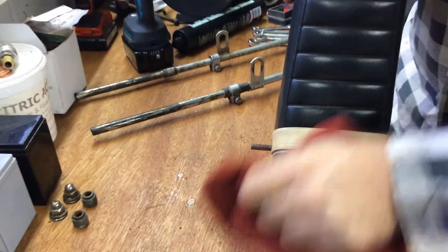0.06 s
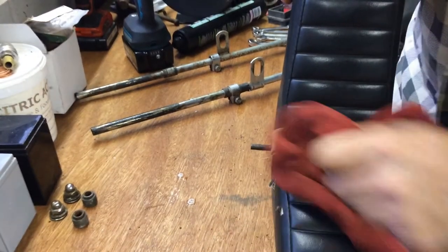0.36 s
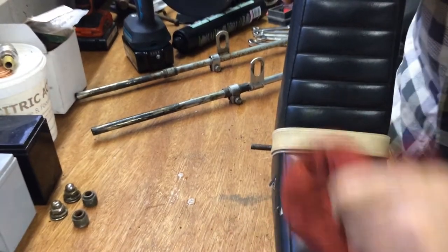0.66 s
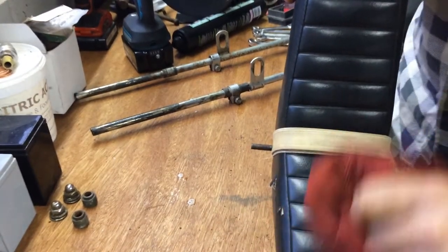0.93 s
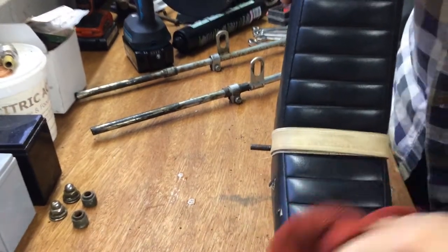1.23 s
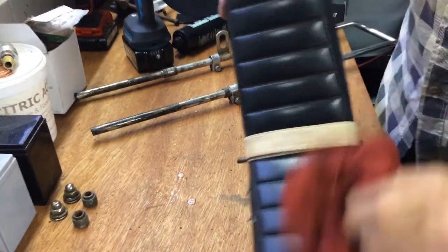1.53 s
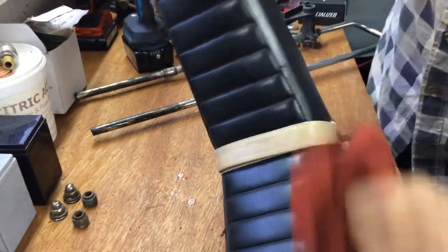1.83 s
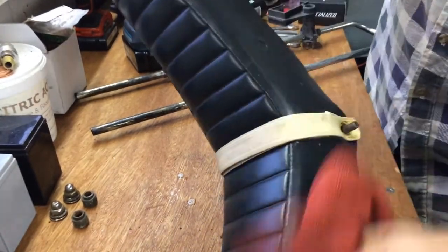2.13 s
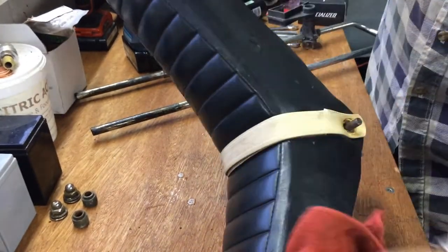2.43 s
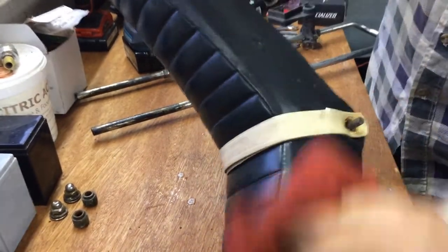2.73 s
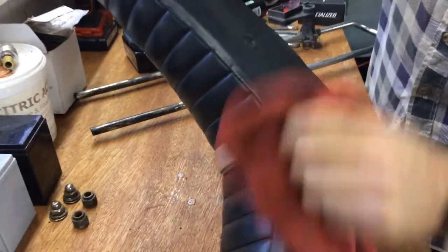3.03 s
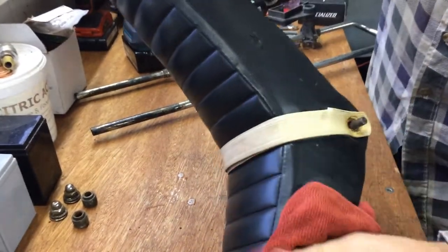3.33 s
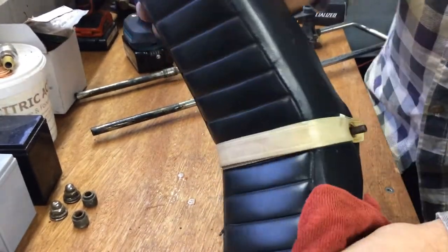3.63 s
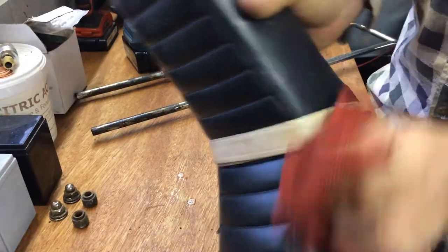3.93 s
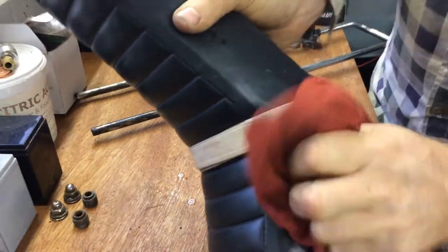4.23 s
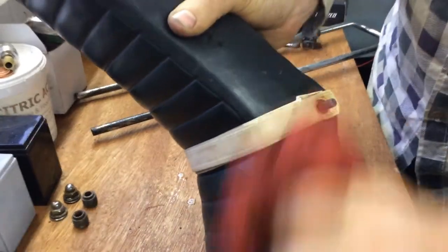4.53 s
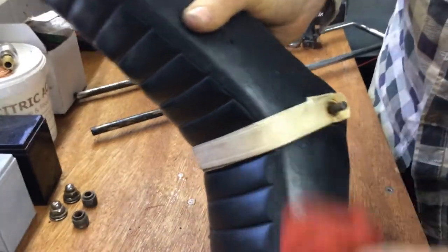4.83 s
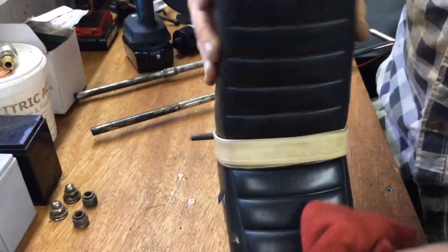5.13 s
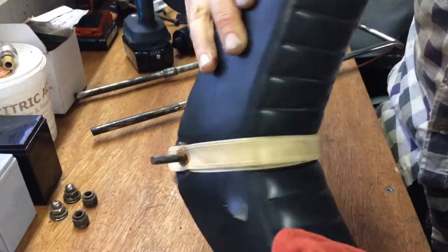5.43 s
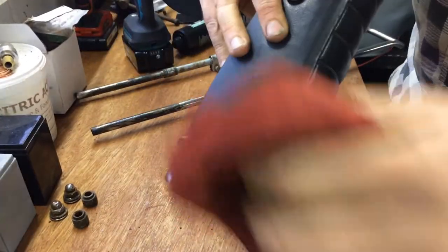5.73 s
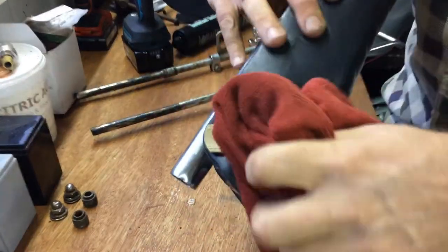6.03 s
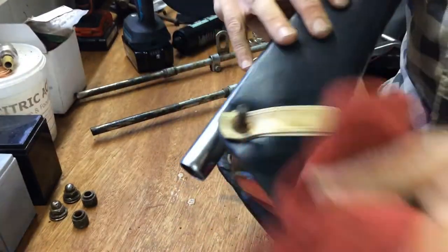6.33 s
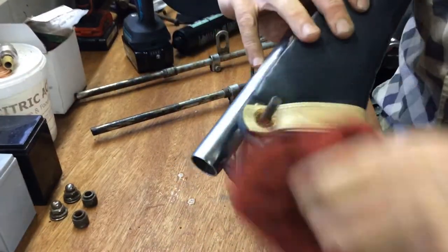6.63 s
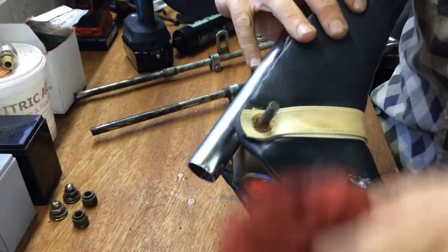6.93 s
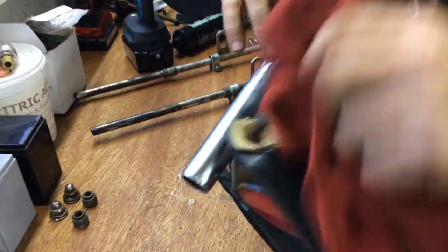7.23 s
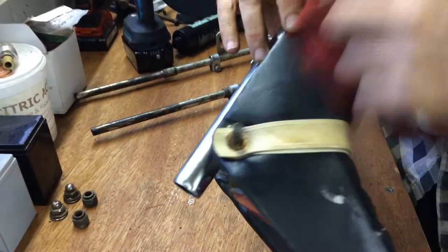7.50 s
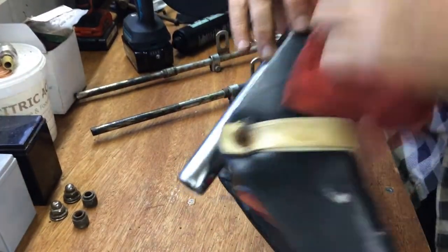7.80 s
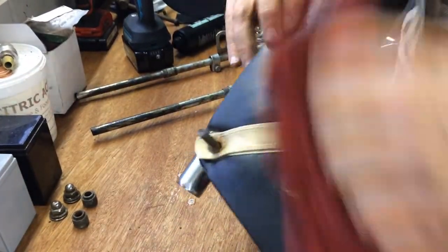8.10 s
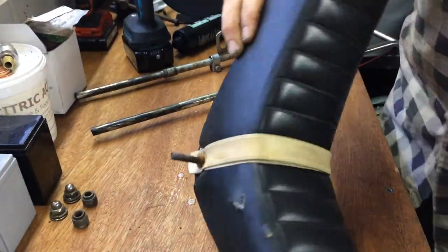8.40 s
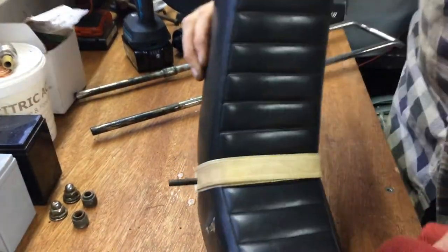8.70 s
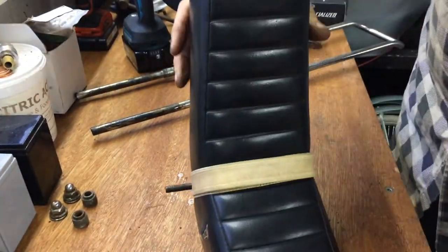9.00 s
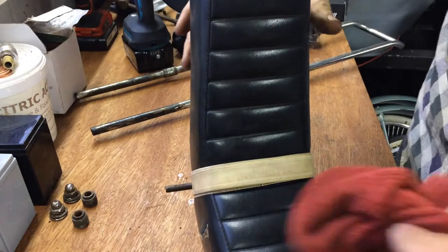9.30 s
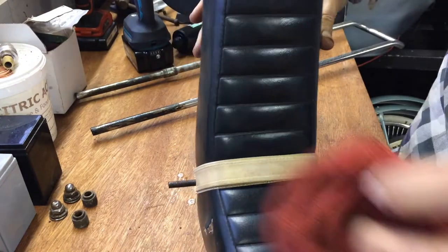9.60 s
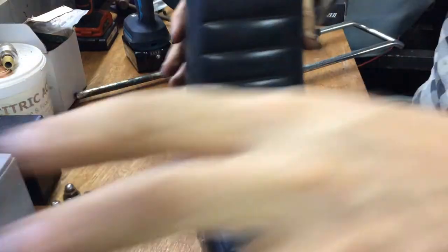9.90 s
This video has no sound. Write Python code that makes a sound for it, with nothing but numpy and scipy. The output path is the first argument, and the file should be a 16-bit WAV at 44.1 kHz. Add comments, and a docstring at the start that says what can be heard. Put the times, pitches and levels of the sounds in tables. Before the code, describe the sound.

A cloth rubs briskly over a padded vinyl seat, with light knocks, two sharp metal clinks and a thud on a workbench.

```python
"""First comes the swish of a cloth, rubbed briskly to and fro over a padded vinyl bicycle seat.
The weave sounds higher and louder as the hand speeds up, the padding rumbles under it, and loose
folds and a sleeve rustle. The seat rocks and knocks on a wooden garage workbench, a corner of the
cloth whisks by, and the steel frame clinks a few times. At last the seat is set upright with a thud."""
import sys
import numpy as np
from scipy import signal
from scipy.fft import rfft, irfft, next_fast_len
from scipy.io import wavfile
from scipy.ndimage import map_coordinates

SR = 44100
rng = np.random.default_rng(int(sys.argv[2]) if len(sys.argv) > 2 else 0)


def waveform_to_disk(signal):
    """Save audio, clipped to [-1, 1], as 16-bit WAV at the path in sys.argv[1]."""
    frames = np.transpose(np.atleast_2d(signal))
    scaled = np.clip(frames, -1, 1) * 32767
    samples = np.round(scaled).astype(np.int16)
    wavfile.write(sys.argv[1], SR, samples)


N = 438794

# The hand's push on the padding. Each row: time in seconds, relative rumble level in dB.
HAND_PUSH = [(0.0, -60), (0.53, -57.5), (1.19, -49.5), (1.41, -56), (2.19, -60), (2.46, -50), (3.38, -51.5),
             (3.77, -62.5), (4.29, -61.5), (4.49, -54), (4.99, -52), (5.15, -51), (5.35, -61.5),
             (5.51, -66), (8.12, -64), (8.29, -66), (8.53, -72), (8.84, -66), (9.2, -74.5), (9.95, -69)]
# The whole bench swaying under a blow. Each row: pitch in Hz, level in dB, seconds to fade by 60 dB.
BENCH_SWAY = [(70, -21.5, 0.2)]


def amp(db):
    """Turn decibels into a number to multiply a sound by."""
    return 10 ** (np.asarray(db) / 20)


def unit(x):
    """Scale a sound to an average strength (rms) of 1."""
    return x / np.sqrt(np.mean(x ** 2) + 1e-20)


def along(points, hz):
    """Read between (Hz, value) points, giving each octave equal room."""
    known_hz, values = np.transpose(points)
    return np.interp(np.log(hz + 1), np.log(known_hz + 1), values)


def curve(rows):
    """Join (seconds, value) rows into one value per sample."""
    return np.interp(np.arange(N) / SR, *np.transpose(rows))


def wobble(rate):
    """A smooth curve through rate random points a second."""
    points = rng.standard_normal(int(N * rate / SR) + 4)
    return map_coordinates(points, [np.arange(N) * rate / SR])


def tint(x, tone):
    """Shape a sound's bass and treble by (Hz, dB) rows, then scale it to strength 1."""
    size = next_fast_len(len(x) + 8192)
    gain = amp(along(tone, np.fft.rfftfreq(size, 1 / SR)))
    return unit(irfft(rfft(x, size) * gain, size)[:len(x)])


def grainy(rate, spread_db):
    """Tiny random snags of varying size, rate a second."""
    hit = rng.random(N) < rate / SR
    return unit(hit * rng.standard_normal(N) * amp(spread_db * np.clip(rng.standard_normal(N), -2, 2)))


def add(track, start, sound):
    """Mix a sound into the track, start seconds in."""
    part = track[max(round(start * SR), 0):][:len(sound)]
    part += sound[:len(part)]


def ring(notes, t, vary_db):
    """The fading notes of a struck object, a little different in strength each time."""
    return sum(amp(db + vary_db * rng.standard_normal() - 60 * t / fade_s) * np.sin(2 * np.pi * hz * t)
               for hz, db, fade_s in notes)


def burst(tone, t, fade_s):
    """The noise of a hit, dying by 60 dB in fade_s seconds."""
    return tint(rng.standard_normal(len(t)), tone) * amp(-60 * t / fade_s)


def strokes(pull_db=-1, pull_hiss_db=-3.5, vary_db=0.66, speed_vary=0.04):
    """The hand pushes and pulls in turn; the pull is lighter, and no two strokes are alike."""
    # Spells of even rubbing. Each row: start and end in seconds, number of strokes, relative swish and
    # zip levels in dB, base pitch of the zip in Hz, growth over the spell in dB.
    spells = [(0.005, 0.925, 7, -62.5, -55, 1622, 4.5), (0.963, 1.083, 1, -63, -49.5, 1559, 0),
              (1.061, 1.435, 3, -61.5, -55, 1551, 0), (1.486, 1.64, 1, -67.5, -66, 1388, -3),
              (1.65, 1.81, 1, -48.5, -62, 1826, 0), (1.808, 2.084, 2, -60, -56.5, 1600, 5),
              (2.09, 3.383, 10, -56.5, -52.5, 1702, 3), (4.007, 5.009, 8, -53, -53.5, 1691, 1),
              (5.945, 6.133, 1, -58.5, -59.5, 1292, 0), (6.569, 6.996, 3, -58.5, -55.5, 1397, -1),
              (7.349, 8.15, 6, -57, -55.5, 1653, -6), (8.171, 8.337, 1, -53, -68, 1465, 0),
              (9.874, 9.96, 1, -59.5, -63, 2194, -2)]
    moves = []
    for start, end, count, swish_db, zip_db, hz, growth_db in spells:
        turns = np.linspace(start, end, count + 1)
        for k in range(count):
            pull = k % 2
            effort_db = growth_db * ((k + .5) / count - .5) + pull_db * pull
            effort_db += vary_db * rng.standard_normal()
            top_hz = hz * (1 + speed_vary * rng.standard_normal())
            moves.append((turns[k], turns[k + 1], swish_db + effort_db, zip_db + effort_db,
                          top_hz, pull_hiss_db * pull))
    return moves


def swing(start, end):
    """The hand's speed through one stroke: rest, full speed, rest."""
    return np.sin(np.linspace(0, np.pi, max(round((end - start) * SR), 2))).clip(0, 1)


def slide(travel, tone):
    """A rough surface passing by: the faster the travel, the higher it sounds."""
    return map_coordinates(tint(rng.standard_normal(N), tone), [travel], order=5, mode="wrap")


def rubbing(moves, turn_speed=0.55, rib_hz=1700, pitch_factor=1.08, grit_db=2.5):
    """The weave swishes over the vinyl and its ribs zip: the faster the hand, the higher and louder."""
    # The tone of the weave and of its ribs at speed 1. Each row: frequency in Hz, level in dB.
    weave_tone = [(150, 1), (400, 0.5), (750, -1.5), (1150, 3.5), (1700, 2), (2400, 1.5), (3300, -0.5),
                  (5000, -7), (8000, -14.5), (14000, -30.5)]
    rib_tone = [(500, -20.5), (1000, -9.5), (1400, -4), (1700, -3), (1950, -5), (2600, -15), (4000, -40.5)]
    speed, swish, zips = np.full(N, turn_speed), np.zeros(N), np.zeros(N)
    for start, end, swish_db, zip_db, top_hz, _ in moves:
        arc = swing(start, end)
        add(speed, start, arc * (pitch_factor * top_hz / rib_hz - turn_speed))
        add(swish, start, amp(swish_db + 0.8) * arc ** 0.84)  # a broad swell
        add(zips, start, amp(zip_db + 0.55) * arc ** 2.2)  # mostly in mid-stroke
    travel = np.cumsum(np.clip(speed * (1 + .05 * wobble(60)), .1, 2))
    grit = amp(grit_db * wobble(220))
    return grit * (swish * slide(travel, weave_tone) + zips * slide(travel, rib_tone))


def push_at(time):
    """How hard the hand pushes at this time, in dB."""
    return np.interp(time, *np.transpose(HAND_PUSH))


def padding(moves, ribs_per_stroke=2, rib_db=9.5, scatter_s=0.01516, sway_db=6):
    """The padding shudders under the hand; each bump gives a hollow thump and sways the bench."""
    # The tone of the rumble. Each row: frequency in Hz, level in dB.
    rumble_tone = [(20, -30), (40, -21.5), (58, -6.5), (85, -3), (118, 2), (160, -2), (240, -7.5),
                   (340, -12.5), (600, -21), (1200, -34.5), (3000, -58), (8000, -83)]
    # The heaviest bumps over the padding's edges. Each row: start in seconds, relative level in dB.
    edge_bumps = [(0.303, -34.5), (0.618, -43), (1.015, -36.5), (1.841, -37), (2.255, -34), (4.447, -36),
                  (4.582, -35), (5.96, -34), (6.05, -43), (6.526, -33), (7.25, -44), (7.803, -37.5),
                  (7.865, -43), (8.265, -42)]
    # The padded seat's notes. Each row: pitch in Hz, level in dB, seconds to fade by 60 dB.
    seat_notes = [(62, -17, 0.21), (114, 0, 0.07), (154, -3, 0.085), (248, -9, 0.047)]
    out = tint(grainy(rate=2700, spread_db=3.5), rumble_tone)
    out *= amp(curve(HAND_PUSH) + 1.5 + 2.4 * wobble(30))
    t = np.arange(SR // 4) / SR
    rib_times = [start + (end - start) * (k + .5) / ribs_per_stroke + scatter_s * rng.standard_normal()
                 for start, end, *_ in moves for k in range(ribs_per_stroke)]
    rib_bumps = [(time, push_at(time) + rib_db) for time in rib_times]
    for start, db in edge_bumps + rib_bumps:
        thump = ring(seat_notes, t, vary_db=3.5) + amp(sway_db) * ring(BENCH_SWAY, t, vary_db=2.5)
        add(out, start, amp(db) * thump * (1 - np.exp(-t / 0.0035)))  # the foam gives way slowly
    return out


def stroke_swell(moves, turn_db=-7, lift_db=10):
    """A level in dB that rises in mid-stroke and sinks at each turn of the hand."""
    swell_db = np.zeros(N)
    for start, end, *_, hiss_db in moves:
        add(swell_db, start, turn_db + (lift_db + hiss_db) * swing(start, end))
    return swell_db


def folds(moves):
    """Loose folds of cloth brush along, their fibres snagging in a fine hiss."""
    # How strongly the folds brush. Each row: time in seconds, relative level in dB.
    hiss_levels = [(0.0, -68), (0.77, -66), (1.33, -71), (1.8, -67), (2.77, -70), (3.16, -62.5), (3.3, -63),
                   (3.49, -67.5), (4.16, -66), (4.68, -63), (4.88, -63), (5.1, -74.5), (5.37, -77.5),
                   (5.74, -72.5), (6.04, -67.5), (6.15, -72.5), (6.29, -77), (6.54, -67), (6.76, -64),
                   (7.09, -70.5), (7.57, -63), (8.4, -66.5), (8.56, -83.5), (9.48, -79), (9.78, -81),
                   (9.95, -68)]
    # The tone of the fibres. Each row: frequency in Hz, level in dB.
    fibre_tone = [(100, -7), (400, -18.5), (1000, -7), (2100, 9.5), (3000, 4.5), (6500, 4.5), (10000, 0.5),
                  (15500, -2.5)]
    hiss = tint(rng.standard_normal(N) + 0.36 * grainy(rate=1200, spread_db=8), fibre_tone)
    return hiss * amp(curve(hiss_levels) + 3 + stroke_swell(moves) + 1.6 * wobble(40))


def sleeve(moves):
    """The sleeve and shirt rustle softly as the arm moves."""
    # How strongly they rustle. Each row: time in seconds, relative level in dB.
    rustle_levels = [(0.0, -61.5), (1.22, -59.5), (2.08, -66), (2.63, -61), (3.18, -60.5), (3.82, -70.5),
                     (4.27, -59.5), (4.82, -59.5), (5.15, -68), (6.48, -72), (6.73, -69), (6.9, -66),
                     (8.09, -62.5), (8.48, -72), (9.39, -79), (9.95, -71.5)]
    # The tone of flannel. Each row: frequency in Hz, level in dB.
    flannel_tone = [(100, -8.5), (300, 0), (600, 0), (900, 1), (1700, -3.5), (2150, -4.5), (2700, -6),
                    (6000, -15.5), (15000, -31.5)]
    rustle = tint(grainy(rate=5000, spread_db=2), flannel_tone)
    return rustle * amp(curve(rustle_levels) + 0.82 + 0.26 * stroke_swell(moves) + 3.4 * wobble(22))


def rocking(moves, thump_db=2.5, clack_db=-7, vary_db=3):
    """List the hits of the seat on the bench: clear knocks as it rocks, one more chatter after it lands, and a
    faint tap in each stroke."""
    # The seat hitting the bench: knocks as it rocks, and at 8.89 s a chatter after it lands. Each row: start in
    # seconds, relative thump and clack levels in dB.
    clear_knocks = [(0.434, -55.5, -53.5), (1.249, -44, -57), (1.477, -52, -53.5), (1.617, -45.5, -52.5),
                    (2.1866, -46, -44), (3.527, -44.5, -55), (3.943, -54, -59.5), (4.006, -51.5, -56.5),
                    (4.536, -51, -51), (4.736, -35, -59), (4.967, -38, -69), (5.103, -40.5, -65),
                    (5.189, -46, -76), (5.279, -50, -55), (6.508, -65, -52), (6.533, -44.5, -51.5),
                    (6.908, -55, -51.5), (7.292, -42, -42), (7.415, -49, -50), (7.51, -65, -50),
                    (8.009, -60, -56), (8.8917, -52, -56), (9.903, -52.5, -59)]
    taps = []
    for start, end, *_ in moves:
        time = rng.uniform(start, end)
        push_db = push_at(time) + vary_db * rng.standard_normal()
        taps.append((time, push_db + thump_db, push_db + clack_db))
    return clear_knocks + taps


def knocks(hits, low_hz=155, high_hz=560):
    """Each hit thumps the bench top and sways the bench; a harder contact adds a clack."""
    # The notes of the bench under the seat. Each row: pitch in Hz, level in dB, seconds to fade by 60 dB.
    bench_notes = [(164.7, -30.5, 0.45), (197.8, -14, 0.22), (267, 2.5, 0.025), (272.5, -25.5, .18),
                   (345.5, -17, 0.13), (379, -18, 0.076), (457, -24, .11), (488, -6.5, .025)]
    # The tone of a clack. Each row: frequency in Hz, level in dB.
    clack_tone = [(80, -32), (300, -5), (700, 9), (1100, 5.5), (1600, 3.5), (2100, -4.5), (2800, -15),
                  (5500, -24), (9000, -42), (16000, -43)]
    thumps, sways, clacks = np.zeros((3, N))
    t = np.arange(SR // 2) / SR
    for start, thump_db, clack_db in hits:
        add(thumps, start, amp(thump_db + 5.5) * ring(bench_notes, t, vary_db=4))
        add(sways, start, amp(thump_db) * ring(BENCH_SWAY, t, vary_db=4))
        clack = burst(clack_tone, t, fade_s=0.06) * (1 - np.exp(-t / 0.00089))
        add(clacks, start, amp(clack_db + 8) * clack)
    # The open bench top gives off little bass, and the padded seat lands too softly to stir its treble.
    band = signal.butter(4, [low_hz, high_hz], "bandpass", fs=SR, output="sos")
    return clacks + sways + signal.sosfilt(band, thumps)


def whisks():
    """A light, fast touch of the cloth's corner gives a short, very bright hiss."""
    # Flicks across the vinyl. Each row: start in seconds, length in seconds, level in dB.
    flicks = [(1.634, 0.18, -55), (2.65, 0.074, -57.5), (3.714, 0.26, -60.5), (4.755, 0.014, -47),
              (5.039, 0.066, -64), (5.612, 0.11, -60.5), (5.849, 0.28, -63.5), (6.328, 0.092, -69),
              (6.73, 0.06, -58), (7.285, 0.0171, -50.5), (7.799, 0.018, -52), (8.497, 0.1, -64.5),
              (9.433, 0.14, -66.5)]
    # The tone of a flick. Each row: frequency in Hz, level in dB.
    flick_tone = [(500, -26), (3000, -2), (5000, 0.5), (8000, 0), (12500, -4), (16000, -7.5)]
    gain = np.zeros(N)
    for start, length, db in flicks:
        add(gain, start, amp(db) * np.hanning(round(length * SR)))
    return gain * tint(grainy(rate=12000, spread_db=1), flick_tone)


def clinks(flutter_db=1.5):
    """The steel frame strikes something hard: a sharp crack, then a short, uneven ring builds up."""
    # The strikes. Each row: start in seconds, crack level in dB, ring level in dB.
    strikes = [(2.9167, -22, -30), (3.137, -19.5, -22), (3.364, -31, -37.5), (3.38, -39, -47.5)]
    # The frame's notes. Each row: pitch in Hz, level in dB, seconds to fade by 60 dB.
    steel_notes = [(914, -10.5, 0.13), (1150, -15.5, 0.16), (1372, 9.5, 0.038), (3840, -20, 0.08),
                   (4600, -15, 0.17), (4675, -2.5, 0.1), (4970, -11, 0.072), (5300, -15, 0.086),
                   (6200, -18.5, 0.16), (9243, -12.5, 0.16), (13350, -20, 0.13), (13600, -13, .1),
                   (14533, -19, .13), (15245, -18.5, .13)]
    # The tone of the crack. Each row: frequency in Hz, level in dB.
    crack_tone = [(60, -12.5), (200, 1), (700, -1.5), (1400, 1), (2200, -7.5), (3600, -9.5), (5200, -6),
                  (7000, -12.5), (9000, -12.5), (11500, -24.5), (13700, -14), (16000, -30)]
    out, t = np.zeros(N), np.arange(SR // 2) / SR
    for start, crack_db, ring_db in strikes:
        steel = ring(steel_notes, t, vary_db=2) * (1 - np.exp(-t / 0.0025))
        crack = burst(crack_tone, t, fade_s=0.054) * (1 - np.exp(-t / 0.00014))
        ring_gain = amp(ring_db + flutter_db * wobble(250)[:len(t)])
        add(out, start, ring_gain * steel + amp(crack_db) * crack)
    return out


def landing(bounces=6, delay_s=0.013, gap_s=0.032, thump_db=-34, clack_db=-38, loss_db=9):
    """List the hits as the seat lands upright and chatters to rest, each weaker than the last."""
    # The thud. One row: start in seconds, relative thump and clack levels in dB.
    thud = (8.7731, -14.5, -30)
    chatter = [(thud[0] + delay_s + k * gap_s, thump_db - k * loss_db, clack_db - k * loss_db)
               for k in range(bounces)]
    return [thud] + chatter


def garage_echo(x, delay_s=0.005):
    """The cluttered room answers with a short echo, shortest in the treble."""
    # How long the room rings. Each row: frequency in Hz, seconds to fade by 60 dB.
    fade_times = [(100, 0.51), (400, 0.18), (1500, 0.17), (6000, 0.1), (15000, 0.095)]
    hz, t, bands = signal.stft(rng.standard_normal(SR // 2), SR, nperseg=256)
    fade = amp(-60 * t / along(fade_times, hz)[:, None])
    _, tail = signal.istft(bands * fade, SR, nperseg=256)
    echo = np.pad(tail / np.linalg.norm(tail), (round(delay_s * SR), 0))
    return signal.fftconvolve(x, echo)[:N]


def scene():
    """The cloth and the seat with their echo, over the room's faint steady noise."""
    # The tone of the room's noise. Each row: frequency in Hz, level in dB.
    air_tone = [(20, -17), (40, -6), (60, 10.5), (85, -10), (170, -16), (350, -15.5), (700, -26.5),
                (1300, -18.5), (2200, -30.5), (5000, -32), (9000, -31.5), (15500, -32.5)]
    moves = strokes()
    near = rubbing(moves) + padding(moves) + folds(moves) + sleeve(moves) + whisks()
    near += knocks(landing() + rocking(moves)) + clinks()
    air = amp(-68.5) * tint(rng.standard_normal(N), air_tone)
    return (near + amp(-16.5) * garage_echo(near) + air)[None]


def record(dry, top_hz=15900):
    """Cut away the very highest treble."""
    size = next_fast_len(N + 8192)
    kept = np.fft.rfftfreq(size, 1 / SR) < top_hz
    return irfft(rfft(dry, size) * kept, size)[..., :N]


dry = scene()
out = record(dry)
waveform_to_disk(out)
```